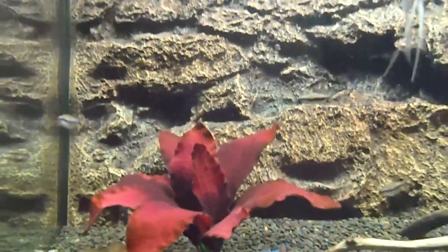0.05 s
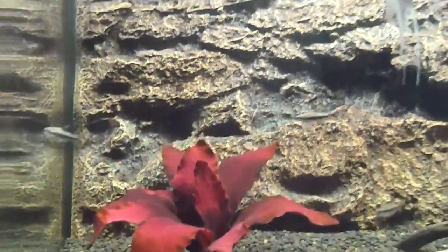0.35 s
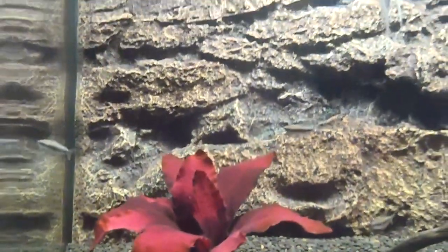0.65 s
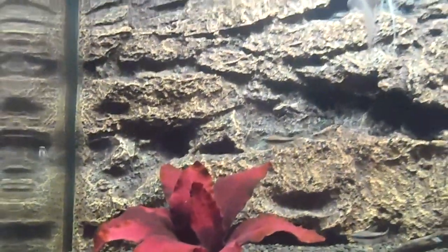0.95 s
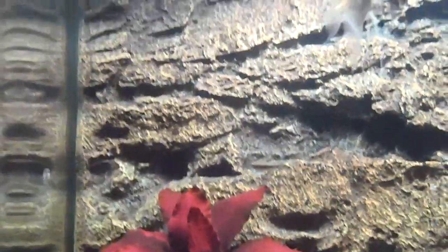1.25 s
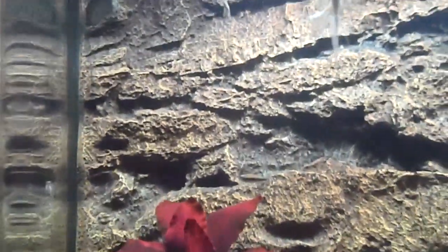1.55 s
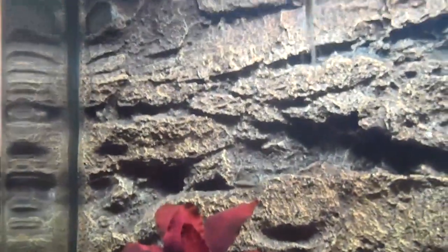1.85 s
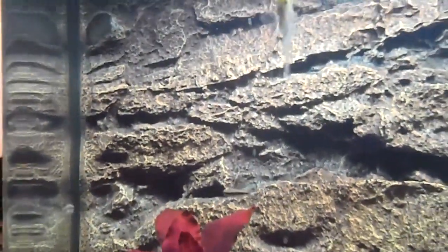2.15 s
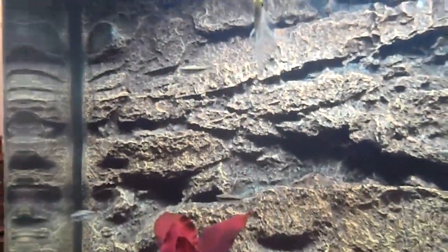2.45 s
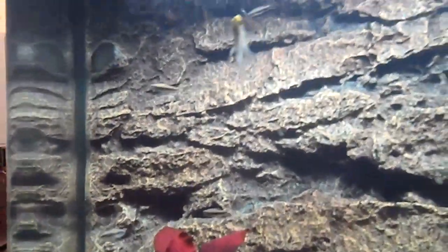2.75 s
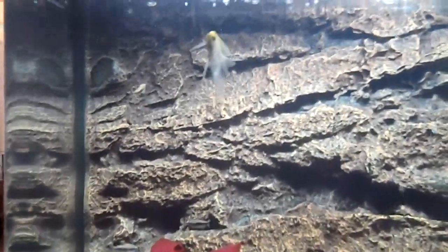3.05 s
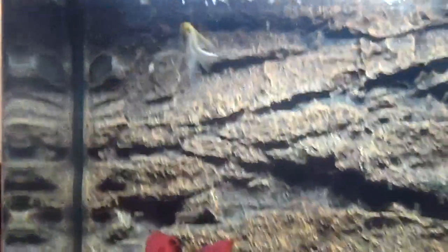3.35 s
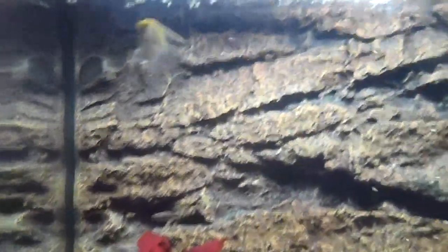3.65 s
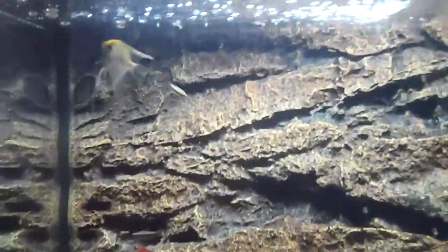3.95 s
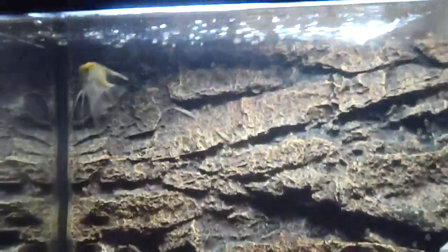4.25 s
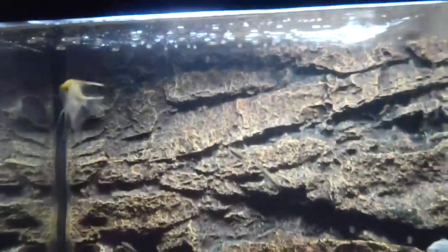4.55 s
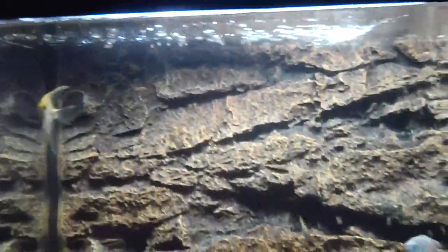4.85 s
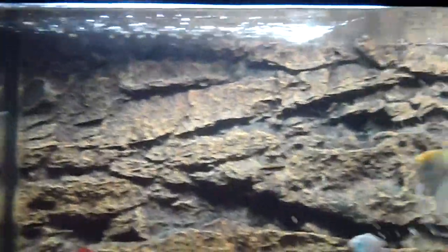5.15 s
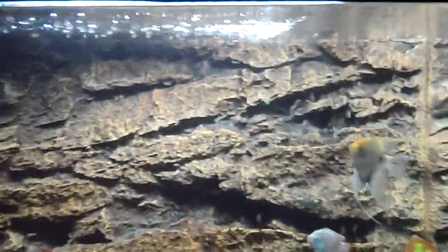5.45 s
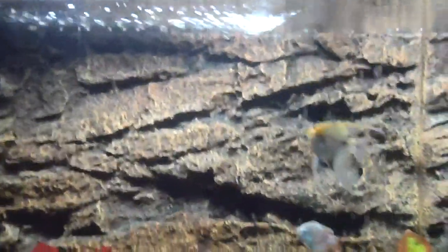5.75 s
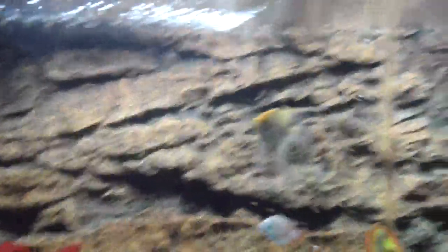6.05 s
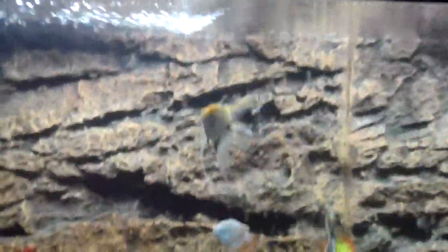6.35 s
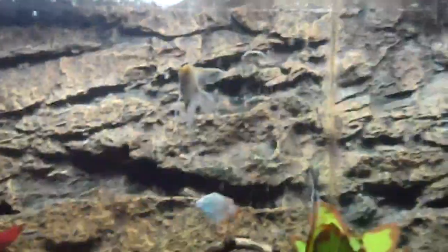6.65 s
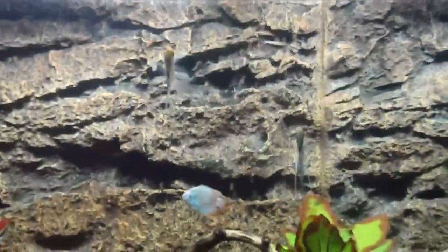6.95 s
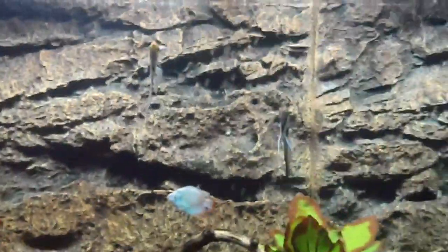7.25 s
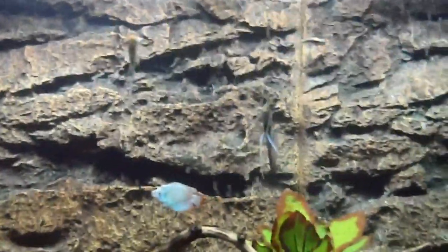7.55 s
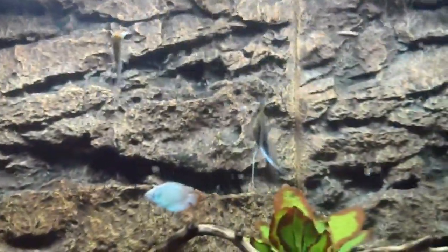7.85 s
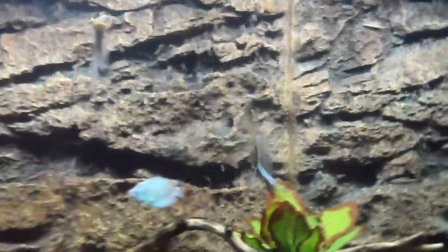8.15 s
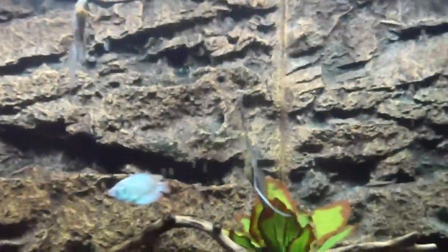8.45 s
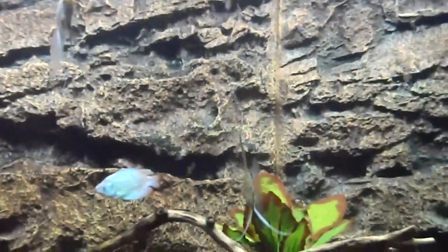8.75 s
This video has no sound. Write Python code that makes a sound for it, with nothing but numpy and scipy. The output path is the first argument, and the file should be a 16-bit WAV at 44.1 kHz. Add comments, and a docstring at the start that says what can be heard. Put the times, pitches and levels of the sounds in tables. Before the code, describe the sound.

Just outside the glass of an aquarium in a quiet room, the filter outflow makes a steady, high fizz of tiny bubbles. Small irregular gushes, bright pings and a softer burble run through it, ringing slightly under the lid. A hand faintly bumps and rubs the camera, and past the middle gives a quick cluster of sharp clicks and knocks. The bubbling carries on over even room noise.

```python
"""A quiet room, just outside the glass of a running aquarium. The filter outflow pulls air under
the surface and each bubble rings as a short sine: a fizz of tiny ones, a softer burble of large
ones, now and then a gush or a single bright ping. Glass and lid echo the water, and the air
under the hood rings. A hand bumps, rubs and clicks a camera case over steady room noise."""
import sys
import numpy as np
from scipy import signal
from scipy.fft import rfft, irfft
from scipy.io import wavfile
from scipy.ndimage import uniform_filter1d

SR = 44100
rng = np.random.default_rng(int(sys.argv[2]) if len(sys.argv) > 2 else 0)


def to_wav(s):
    """Save 16-bit WAV."""
    ch = np.atleast_2d(s).T  # columns
    pcm = np.round(np.clip(ch, -1, 1) * 32767)  # PCM
    wavfile.write(sys.argv[1], SR, pcm.astype(np.int16))


N = 388080
TIME_S = np.arange(N) / SR

# Room noise spectrum. Each row: frequency in Hz, relative density in dB.
ROOM_SPECTRUM = [(20, -6.5), (60, -5.5), (130, -4), (250, -1), (450, -0.5), (640, -0.5), (900, -2),
                 (1200, -3.5), (2500, -2.5), (5000, -6.5), (7500, -10.5), (10000, -11.5), (14000, -12.5)]
# Gulps of air breaking into tiny bubbles.
# Each row: start in seconds, length in seconds, dry level in dB, pitch in Hz.
FIZZ_GUSHES = [(0, .04, -43, 3588), (.29, .13, -43, 3767), (.555, 0.066, -47, 3799),
               (.777, 0.053, -41.5, 3822), (1.05, .06, -42, 3630), (1.263, 0.073, -43, 3818),
               (1.45, .065, -41.5, 3570), (1.897, .06, -42.5, 3986), (2.012, .025, -44, 3300),
               (2.09, .12, -42, 3614), (2.335, .04, -46, 3650), (2.41, .045, -46.5, 4074),
               (2.537, .04, -44, 3505), (2.653, .055, -40.5, 3934), (2.852, .03, -43, 3370),
               (3.043, .04, -47, 3900), (3.299, .07, -42.5, 3660), (3.57, .09, -43.5, 3986),
               (3.68, .05, -42, 3528), (3.775, .05, -44, 3955), (3.875, .045, -42, 3566),
               (4.005, .09, -44, 3752), (4.128, .1, -44, 3705), (4.617, .04, -44.5, 3807),
               (4.736, .035, -42.5, 3805), (4.93, .13, -45.5, 3790), (5.185, .17, -46, 3752),
               (5.46, .045, -44.5, 3670), (5.643, 0.03, -43, 3814), (5.806, .075, -40, 3834),
               (5.95, .035, -45.5, 4200), (6.088, .045, -39.5, 3558), (6.24, .04, -42, 3869),
               (6.4, .07, -47, 4051), (6.605, .08, -44.5, 3873), (6.818, .05, -40, 3866),
               (6.9, .11, -46, 4077), (7.2, .04, -47.5, 4170), (7.342, .035, -43, 3590),
               (7.54, .08, -44, 3883), (7.775, 0.069, -43.5, 3795), (7.89, .1, -43.5, 4000),
               (8.025, .035, -43.5, 3644), (8.315, .045, -43.5, 3848), (8.535, 0.042, -42, 3805)]
# Contour of the finest spray. Each row: time in seconds, base level in dB.
SPRAY_CONTOUR = [(0.0, -55), (3.11, -54), (3.21, -59), (3.36, -55.5), (3.55, -60), (3.58, -52),
                 (3.95, -57.5), (4.46, -53.5), (4.85, -60), (6.1, -53), (6.2, -59), (6.93, -51),
                 (7.16, -60), (7.3, -51.5), (7.62, -54.5), (8.21, -53.5), (8.38, -58.5), (8.8, -52.5)]
# Air modes under the hood. Each row: frequency in Hz, gain in dB, T60 in seconds.
HOOD_MODES = [(1740, -26, 0.16), (2040, -17, 0.15), (2560, -11, 0.035), (3326, 1.5, 0.081),
              (3680, -16, 0.079), (3915, -2, 0.072), (4060, -13, 0.13)]
# Glugs of large bubbles. Each row: start in seconds, length in seconds, dry level in dB, pitch in Hz.
BURBLE_GLUGS = [(.09, .07, -52.5, 1997), (.23, .08, -52, 2187), (.39, .1, -53, 1989),
                (.8, .13, -53.5, 1919), (1.03, .09, -51.5, 1838), (1.39, .055, -53, 1975),
                (1.66, .11, -54.5, 2025), (2.23, .12, -54, 1910), (2.96, .09, -54, 1927),
                (3.41, .1, -54, 1784), (3.65, .15, -51, 2033), (4.4, .1, -53, 2067), (4.93, .1, -52, 1951),
                (5.18, .14, -51, 2394), (5.46, .11, -51, 2150), (5.62, .09, -52, 2304),
                (5.815, .08, -50, 2130), (6.297, .045, -47.5, 2290), (7.35, .09, -55, 1962),
                (7.77, .08, -54, 2134), (8.05, .08, -53, 1960), (8.305, .05, -51, 2150),
                (8.4, .14, -52.5, 2600)]
# Hand bumps. Each row: peak time in seconds, peak before the low cut in dB, swing in Hz.
HAND_BUMPS = [(0.244, -41, 150), (0.552, -37.5, 140), (.736, -46, 100), (1.636, -42, 134.7),
              (3.325, -39, 106), (3.371, -41, 137), (3.418, -34, 116.4), (5.021, -39, 190),
              (5.111, -41, 140), (5.472, -40, 65), (5.549, -41, 60), (6.104, -37.5, 90),
              (6.543, -21.5, 335), (6.5914, -23.5, 180)]
# Single bubbles. Each row: peak time in seconds, dry peak in dB, pitch in Hz, length in seconds.
BUBBLE_PINGS = [(0.364, -27, 3760, .003), (0.376, -27, 3750, .0022), (0.688, -19, 3480, .0007),
                (0.8, -31, 3810, .0013), (0.934, -32, 3660, .004), (1.157, -42.5, 2680, .016),
                (1.926, -44, 1740, .012), (1.958, -28, 3400, .0016), (2.173, -47, 1616, .01),
                (2.545, -34, 3340, .003), (2.662, -28, 4020, 0.0019), (2.787, -30, 3240, .0023),
                (2.859, -27.5, 3220, .0029), (3.304, -35, 3640, 0.0032), (3.42, -47, 1560, 0.0093),
                (3.469, -30, 3400, .0014), (3.542, -43, 2630, .012), (3.708, -26, 3300, .0016),
                (3.914, -43.5, 1610, .014), (4.071, -29.5, 3690, .0034), (4.25, -26, 3660, .0036),
                (4.309, -34.5, 1780, 0.0052), (4.343, -28.5, 3920, .0021), (4.953, -41, 1820, 0.0055),
                (4.999, -39, 2910, .008), (5.07, -41.5, 2380, .013), (5.206, -38.5, 2410, .006),
                (5.356, -31, 3640, .002), (5.74, -31, 4200, .0021), (5.81, -31, 3860, .0025),
                (6.02, -27.5, 2900, .002), (6.098, -27, 3700, 0.0023), (7.023, -45.5, 1680, 0.021),
                (7.411, -41.5, 1790, 0.0067), (7.512, -35, 3200, .007), (7.785, -30, 3830, .002),
                (8.55, -25.5, 3830, .002)]
# Finger rubs. Each row: start in seconds, initial level in dB, centre in Hz, 1/e decay in seconds.
FINGER_RUBS = [(0.388, -57, 189, 0.014), (0.539, -50, 169, 0.021), (.934, -44.5, 1110, .006),
               (1.089, -59, 149, 0.052), (1.629, -60, 130, 0.032), (3.169, -49.5, 280, 0.011),
               (3.33, -57, 149, .04), (3.39, -53, 168, 0.069), (5.019, -56, 198, 0.11),
               (5.544, -35.5, 1600, 0.008), (5.861, -42.5, 1360, 0.032), (5.864, -47.5, 227, 0.028),
               (6.017, -33.5, 1700, 0.0062), (6.1, -46.5, 260, 0.01), (6.59, -27.5, 1740, 0.0031)]
# Case clicks. Each row: start in seconds, peak in dB, centre of excitation in Hz.
CASE_CLICKS = [(5.5485, -23.5, 820), (6.024, -38, 1370), (6.543, -20, 1550), (6.5912, -26, 600),
               (6.6055, -16, 2900)]
# Damped case modes. Each row: frequency in Hz, relative gain in dB, 1/e decay in seconds.
CASE_MODES = [(620, -4, 0.0012), (850, -2, .0024), (1520, -13, .0026), (1770, 0, .0018), (2480, 4, 0.00085),
              (3930, -3.5, 0.0044), (6500, -4, .0003)]


def gain_of(db):
    """Decibels to amplitude."""
    return 10 ** (np.asarray(db) / 20)


def unit_rms(x):
    """Scale to unit rms."""
    return x / np.sqrt(np.mean(x ** 2) + 1e-20)


def add(mix, start_s, sound):
    """Mix a sound in at start_s."""
    part = mix[max(round(start_s * SR), 0):][:len(sound)]
    part += sound[:len(part)]


def wander(samples):
    """Unit-rms random drift, smoothed over the given span."""
    smooth = uniform_filter1d(rng.standard_normal(N), samples)
    return unit_rms(uniform_filter1d(smooth, samples // 3))


def room(level_db=-50.5):
    """Room air, distant wash of water and hiss: steady coloured noise."""
    hz, db = np.transpose(ROOM_SPECTRUM)
    bins_hz = np.fft.rfftfreq(N, 1 / SR)
    colour = gain_of(np.interp(np.log(bins_hz + 1), np.log(hz), db))
    noise = irfft(rfft(rng.standard_normal(N)) * colour, N)
    return gain_of(level_db) * unit_rms(noise)


def bubbles(peak_s, peak, hz, length_s, rise=0.0083, swell=1.3):
    """Each bubble is a sine that swells and dies, its pitch creeping up as it nears the surface."""
    out = np.zeros(N + SR)
    for batch in np.array_split(np.argsort(length_s), 12):
        tau_s = length_s[batch, None] / (2 * np.sqrt(swell + .5))
        t = np.arange(int(10 * tau_s.max() * SR) + 2) / SR
        age = t / tau_s
        glide = 1 + rise * (np.tanh(age / 10) - .5)
        turns = hz[batch, None] * t * glide + rng.random((len(batch), 1))
        envelope = peak[batch, None] * (age / swell) ** swell * np.exp(swell - age)
        ring = envelope * np.sin(2 * np.pi * turns)
        start_s = np.maximum(peak_s[batch, None] - swell * tau_s, 0)
        index = (start_s * SR).astype(int) + np.arange(len(t))
        out += np.bincount(index.ravel(), ring.ravel(), len(out))[:len(out)]
    return out[:N]


def swarm(level_db, pitch_hz, per_s, spread, cycles, size_db, clump_db, drift):
    """Random bubbles around a drifting pitch; the level flickers. Spread and drift are in log pitch."""
    place, size, detune, ring = rng.random((int(per_s * N / SR), 4)).T
    peak_s = place * N / SR
    centre_hz = np.interp(peak_s, TIME_S, pitch_hz * np.exp(drift * wander(1400)))
    hz = centre_hz * np.exp(spread * np.arctanh(.96 * (2 * detune - 1)))
    peak = gain_of(size_db * np.minimum(-np.log(1 - size), np.pi))
    length_s = cycles / hz * 2 ** (2 * ring - 1)
    stream = unit_rms(bubbles(peak_s, peak, hz, length_s))
    return stream * gain_of(level_db + clump_db * wander(700))


def surges(gulps, trickle_db, trickle_hz, unrest_db, attack_s=.004, sag_db=3.0, release_s=.009):
    """Level in dB and pitch in Hz of a trickle; each gulp of air adds power and pulls the pitch."""
    power = gain_of(trickle_db + unrest_db * wander(2400)) ** 2
    weighted_hz = power * trickle_hz
    for start_s, length_s, db, hz in gulps:
        t = np.arange(0, length_s + 5 * release_s, 1 / SR)
        envelope = np.minimum(t / attack_s, 1) * np.exp(-np.maximum(t - length_s, 0) / release_s)
        gulp_power = (envelope * gain_of(db - sag_db * t / length_s)) ** 2
        add(power, start_s, gulp_power)
        add(weighted_hz, start_s, gulp_power * hz)
    return 10 * np.log10(power), weighted_hz / power


def outflow(plop_hz=3018, spray_hz=4518):
    """Entrained air: tiny bubbles fizz, middling ones plop, the finest sizzle, large ones burble."""
    fizz_db, fizz_hz = surges(FIZZ_GUSHES, trickle_db=-49, trickle_hz=3825, unrest_db=1.0)
    burble_db, burble_hz = surges(BURBLE_GLUGS, trickle_db=-57, trickle_hz=1999, unrest_db=1.25)
    surge_db = fizz_db - fizz_db.mean()
    plop_db = -55 + 0.2 * surge_db + 2.7 * wander(2400)
    spray_db = np.interp(TIME_S, *np.transpose(SPRAY_CONTOUR)) + 1.5 + 0.33 * surge_db
    fizz = swarm(fizz_db, fizz_hz, per_s=720, spread=.066, cycles=11.5,
                 size_db=1.5, clump_db=0.3, drift=.024)
    plops = swarm(plop_db, plop_hz, per_s=520, spread=.115, cycles=13,
                  size_db=3.5, clump_db=1.9, drift=.04)
    spray = swarm(spray_db, spray_hz, per_s=1300, spread=.14, cycles=11,
                  size_db=1.5, clump_db=2.06, drift=.025)
    burble = swarm(burble_db, burble_hz, per_s=420, spread=.13, cycles=18,
                   size_db=2.5, clump_db=1.4, drift=.045)
    return fizz + plops + spray + burble


def hood(water, echo_db=-12, echo_t60_s=0.1):
    """Glass and lid reflect a short tail; the air between them rings at a few pitches."""
    t = np.arange(SR // 8) / SR
    reflections = rng.choice([-1., 1.], len(t)) * (rng.random(len(t)) < .1)
    tail = reflections * gain_of(-60 * t / echo_t60_s)
    response = gain_of(echo_db) * tail / np.linalg.norm(tail)
    response[0] = 1  # direct path
    for hz, db, t60_s in HOOD_MODES:
        decay = gain_of(-60 * t / t60_s)
        response += gain_of(db) * 2 * decay / decay.sum() * np.cos(2 * np.pi * hz * t)
    return signal.oaconvolve(water, response)[:N]


def bumps(damping_per_cycle=4.7):
    """The hand swings the camera body: a symmetric pulse that dies at once."""
    out, t = np.zeros(N), np.arange(8192) / SR
    middle_s = t[-1] / 2
    for peak_s, db, hz in HAND_BUMPS:
        turns = (t - middle_s) * hz
        swing = np.cos(2 * np.pi * turns) * np.exp(-damping_per_cycle * abs(turns))
        add(out, peak_s - middle_s, -gain_of(db) * swing)
    return out


def pings():
    """Single loud bubbles stand out of the fizz."""
    peak_s, db, hz, length_s = np.transpose(BUBBLE_PINGS)
    return bubbles(peak_s, gain_of(db), hz, length_s, rise=0.025, swell=2.005)


def rubs(edge_ratio=0.57):
    """Fingers rub and creak on the case: decaying bursts of band noise."""
    out, t = np.zeros(N), np.arange(8192) / SR
    for start_s, db, hz, decay_s in FINGER_RUBS:
        band = signal.butter(2, [hz * edge_ratio, hz / edge_ratio], "bandpass", fs=SR)
        envelope = np.exp(-t / decay_s)
        burst = signal.lfilter(*band, rng.standard_normal(len(t)) * envelope)
        burst *= np.linalg.norm(envelope) / np.linalg.norm(burst)
        add(out, start_s, gain_of(db) * burst)
    return out


def clicks(width_octaves=0.75):
    """Each click rings the damped case modes near its centre frequency."""
    out, t = np.zeros(N), np.arange(8192) / SR
    for start_s, db, centre_hz in CASE_CLICKS:
        ring = np.zeros(len(t))
        for hz, mode_db, decay_s in CASE_MODES:
            drive = gain_of(mode_db) * np.exp(-(np.log2(hz / centre_hz) / width_octaves) ** 2)
            ring += drive * np.exp(-t / decay_s) * np.sin(2 * np.pi * hz * t)
        add(out, start_s, -gain_of(db) * ring / abs(ring).max())
    return out


def scene(low_cut_hz=30):
    """Mono mix of room, water under the hood and low-cut handling noise."""
    water = hood(pings() + outflow())
    low_cut = signal.butter(2, low_cut_hz, "highpass", fs=SR)
    handling = signal.lfilter(*low_cut, bumps() + rubs() + clicks())
    return (room() + water + handling)[None]


def record(dry, cutoff_hz=14300):
    """Steep low-pass."""
    taps = signal.firwin(601, cutoff_hz, window=("kaiser", 8), fs=SR)
    return signal.oaconvolve(dry, taps[None], "same")


dry = scene()
out = record(dry)
to_wav(out)
```